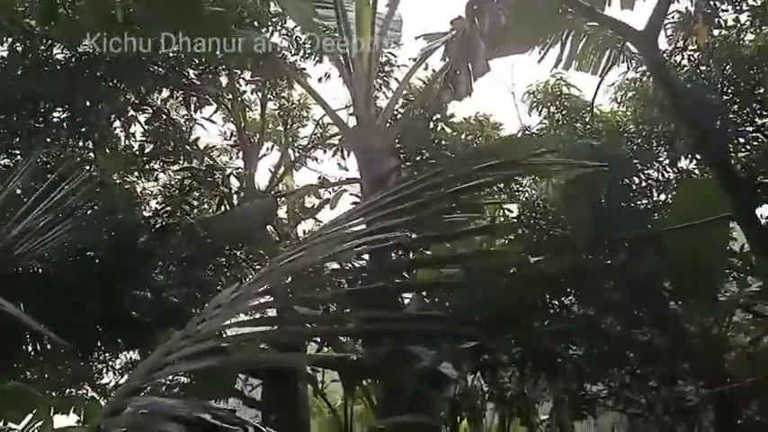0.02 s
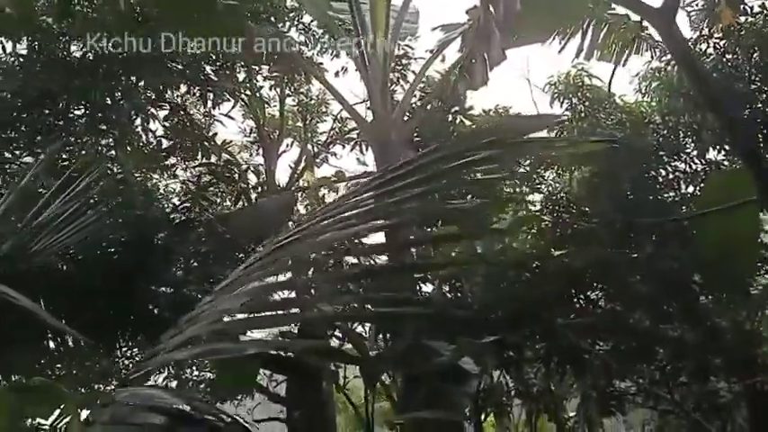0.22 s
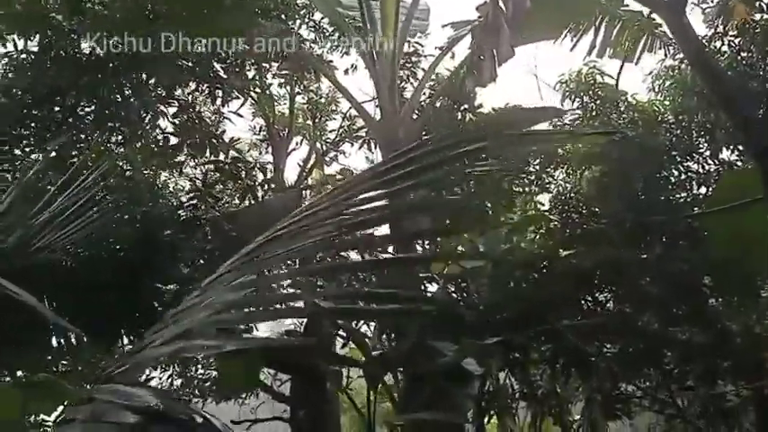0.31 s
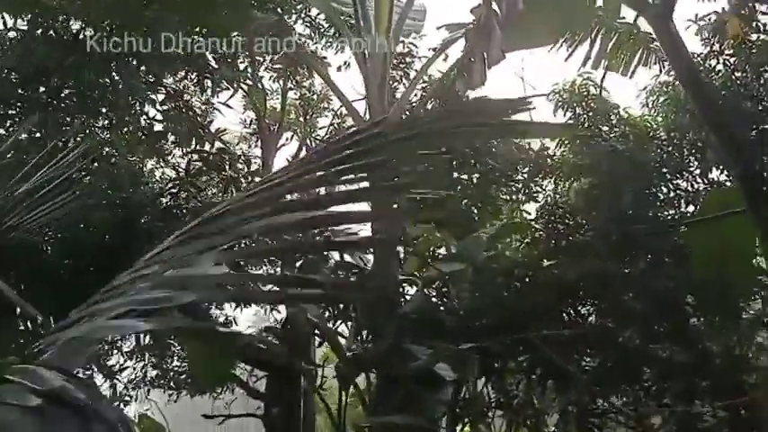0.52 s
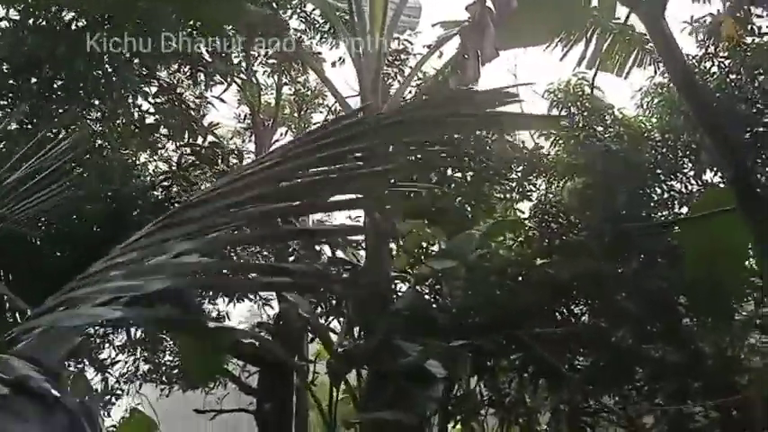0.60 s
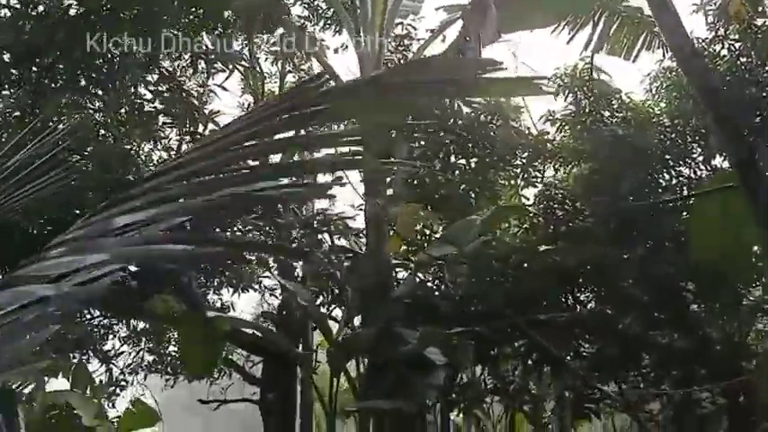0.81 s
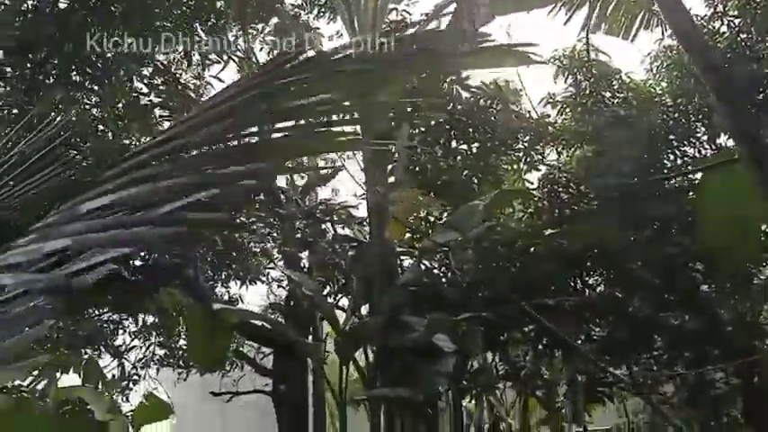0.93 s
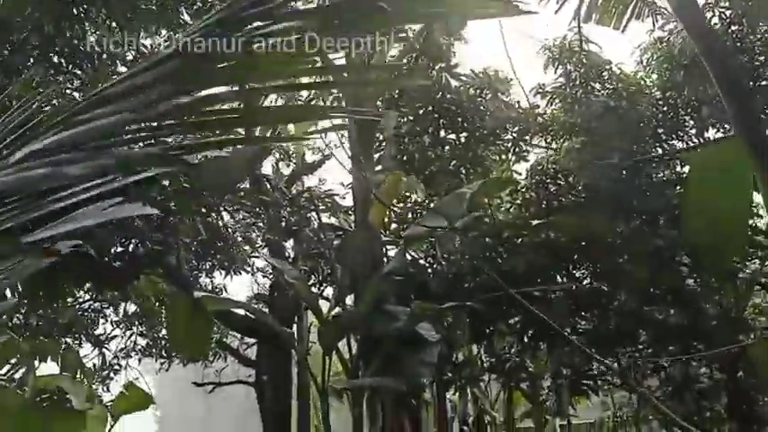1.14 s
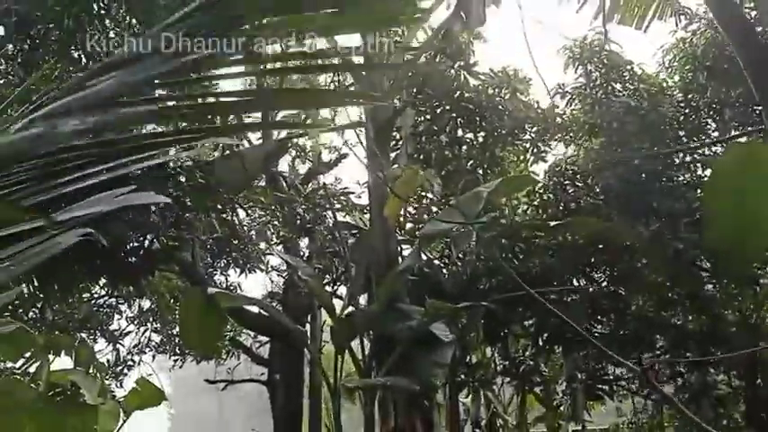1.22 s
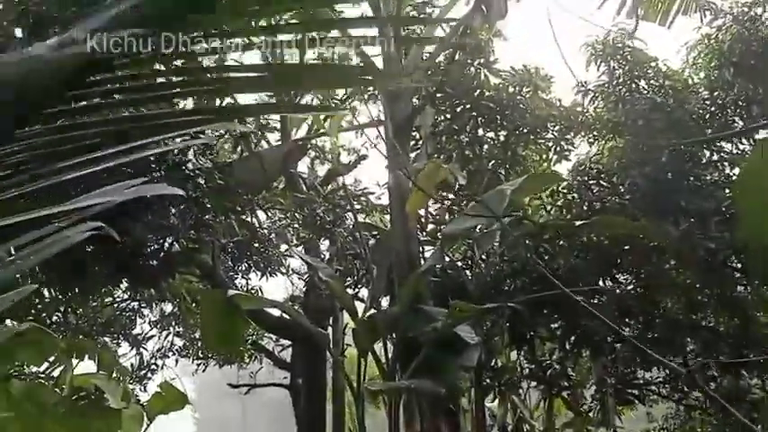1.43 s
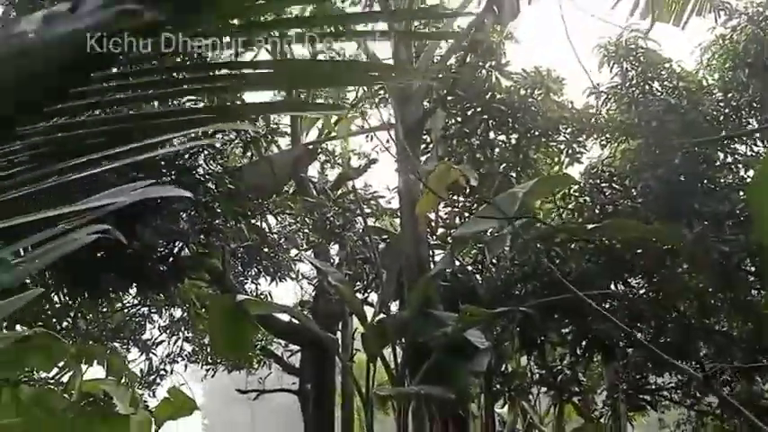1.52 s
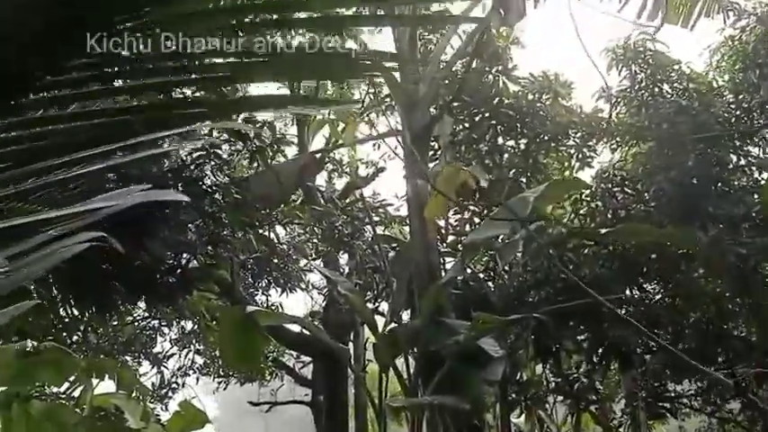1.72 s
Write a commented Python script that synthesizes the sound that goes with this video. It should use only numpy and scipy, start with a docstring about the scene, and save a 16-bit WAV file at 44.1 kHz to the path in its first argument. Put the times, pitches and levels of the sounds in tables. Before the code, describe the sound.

Birds calling in garden trees, one near bird repeating a piercing rising whistle over softer distant chirps

```python
"""Garden trees, under a patchy far chorus and low distant rumble that last throughout (filtered noise).
Softer, more distant notes and dry ticks begin at once: gliding tones with tree echoes, and struck modes.
From 0.2 s a near bird gives a piercing rising whistle every half second: harmonics with wavering tails.
From 0.76 s to 1.4 s one bird calls hoarsely: uneven pulses and breath through a broad throat, with hiss.
"""
import sys
import numpy as np
from scipy import signal
from scipy.io import wavfile

SR = 44100
rng = np.random.default_rng(int(sys.argv[2]) if len(sys.argv) > 2 else 0)


def store_pcm(level_fs):
    """Save levels as 16-bit WAV."""
    pcm = np.round(np.clip(level_fs, -1, 1) * 32767).astype(np.int16)
    wavfile.write(sys.argv[1], SR, np.atleast_2d(pcm).T)


def boost(x):
    """Linear amplitude factor 10**(x/20) for a level x in decibels (scalar or array-like)."""
    u = np.asarray(x, float) / 20
    return 10 ** u


N = 79380
T = np.arange(N) / SR
SIDES = np.array([[.5], [-.5]])  # times a left-minus-right difference: the share of each side


def rms_one(x):
    """Scales a signal to rms 1."""
    return x / np.sqrt(np.mean(x ** 2) + 1e-20)


def at_hz(points, hz):
    """Reads a curve at a frequency, straight between its points on a log frequency axis."""
    points_hz, values = np.transpose(points)
    return np.interp(np.log(hz), np.log(points_hz), values)


def cut(x, hz, kind, order):
    """Butterworth filter that passes the low or the high side of hz."""
    return signal.sosfilt(signal.butter(order, hz, kind, fs=SR, output="sos"), x)


def drift(rate_hz, count):
    """Slow random wander of rms 1, one row each: noise through two equal low-pass poles at rate_hz."""
    step = 20  # samples between drawn values
    pole = np.exp(-2 * np.pi * rate_hz * step / SR)
    noise = rng.standard_normal((count, N // step + 1002))
    slow = signal.lfilter([1], [1, -2 * pole, pole * pole], noise)[:, 1000:]
    return np.array([np.interp(np.arange(N) / step, np.arange(len(v)), rms_one(v)) for v in slow])


def scattered(phase, share, lead):
    """A sine of rms 1; the power share that came through leaves wavers in its own way on each side."""
    flutter_hz = 49.4
    leaves = drift(flutter_hz, count=4)
    phase = phase + lead * SIDES
    in_step = np.sqrt(2 - 2 * share) + np.sqrt(share) * leaves[:2]
    quarter_turn = np.sqrt(share) * leaves[2:]
    return in_step * np.sin(phase) + quarter_turn * np.cos(phase)


def coloured(sources, spectrum, patchy_db):
    """Third-octave bands taken in turn from two (mid, side) pairs, each flickering in level; rms 1."""
    # how alike left and right are: f/Hz, likeness (1 = the same)
    likeness = [(60, 0.96), (125, 0.89), (250, .55), (500, 0.63), (1000, 0.033), (15000, 0.022)]
    edges = 25 * 2 ** (np.arange(29) / 3)
    flicker = drift(8, count=28)
    out = 0
    for k, (low, high) in enumerate(zip(edges, edges[1:])):
        mid, side = cut(sources[k % 2], [low, high], "band", order=2)
        hz = np.sqrt(low * high)
        alike = at_hz(likeness, hz)
        stereo = np.sqrt(1 + alike) * mid + np.sqrt(1 - alike) * side * 2 * SIDES
        out = out + boost(at_hz(spectrum, hz) + patchy_db * flicker[k]) * stereo
    return rms_one(out)


def near_bird():
    """The bird nearest the microphone: four harmonics on one pitch that slides up and holds."""
    # one table a call, tail included:
    # t/s, level/dB, fundamental re level/dB, left minus right of the octave/dB
    calls = [
        [(0.212, -57.5, 15.5, -6), (0.254, -32.5, -4.5, -8.5), (0.274, -39, 3.5, 0), (0.292, -34.5, -10.5, -27),
         (0.314, -45, 9, -1), (0.334, -39, -16, 5), (0.346, -47, 0.5, 4), (0.368, -50.5, 2.5, -27.5),
         (0.398, -53.5, -9, -18), (0.458, -61, -1.5, -2), (0.52, -75, -1, -14)],
        [(0.732, -70.5, 21, -11), (0.74, -49, 8.5, 2), (0.768, -38.5, -11, -15), (0.79, -46, 3, -1),
         (0.814, -36.5, 4.5, -1), (0.858, -43, -4.5, -6.5), (0.876, -52, 4, -5), (0.91, -55, 6.5, -21),
         (0.94, -59.5, 1, -14), (0.962, -60, 9, -6), (0.976, -65, 10, -22), (1.016, -68, 1, -24),
         (1.04, -69, -6, -16)],
        [(1.252, -71, 10, -11), (1.262, -50.5, 5, 14), (1.272, -42, 6.5, -16.5), (1.306, -38.5, 4, 2),
         (1.324, -39.5, -1.5, -5), (1.344, -40.5, -4.5, -9.5), (1.36, -45, 5, -4), (1.376, -46, -8, -16),
         (1.424, -59.5, 4, -1), (1.44, -54, -3, -13.5)],
        [(1.78, -52, 1, -11), (1.8, -47.5, 6, 6)],
    ]
    start_hz, held_hz, glide_s = 3200, 3334, 0.01166
    wobble = 0.00256  # share of the pitch
    attack_s, release_s = 0.0031, 0.09
    leafy = 0.25  # power share through leaves, fundamental and octave
    out = 0
    for call in calls:
        s, db, low_db, pan_db = np.transpose(call)
        hz = held_hz + (start_hz - held_hz) * np.exp(-np.maximum(T - s[0], 0) / glide_s)
        hz = hz * (1 + wobble * drift(32, count=1)[0])
        phase = 2 * np.pi * np.cumsum(hz) / SR
        gate = np.interp(T, [s[0] - attack_s, s[0], s[-1], s[-1] + release_s], [0, 1, 1, 0])
        level = gate * boost(np.interp(T, s, db))
        # lead: radians by which the left side is ahead
        low_gain = boost(np.interp(T, s, low_db) + 4 * SIDES)
        out = out + level * low_gain * scattered(phase, leafy, lead=1.64)
        octave_gain = boost(np.interp(T, s, pan_db) * SIDES + 2.0)
        out = out + level * octave_gain * scattered(2 * phase, leafy, lead=1)
        for harmonic, upper_db in ((3, -20.5), (4, -31)):  # dB re level
            upper_gain = boost(upper_db + 6.5 * SIDES)
            out = out + level * upper_gain * scattered(harmonic * phase, 0.69, lead=1.6)
    return out


def notes(rows, octave_db, third_db, pan_db, octave_pan_db):
    """Each note glides towards its end pitch, rough in pitch and broken in level, and stops."""
    glide_share = 0.35  # glide time constant, share of the note length
    attack_s, release_s = 0.0031, 0.0071
    rough_hz, broken_db = 28, 3  # rms of the wander
    out = 0
    for s, length, hz0, hz1, db in rows:
        hz = hz1 + (hz0 - hz1) * np.exp(-np.maximum(T - s, 0) / (glide_share * length))
        hz = hz + rough_hz * drift(67.5, count=1)[0]
        phase = 2 * np.pi * np.cumsum(hz) / SR
        gate = np.interp(T, [s, s + attack_s, s + length, s + length + release_s], [0, 1, 1, 0])
        level = gate * boost(db + broken_db * drift(36, count=1)[0])
        fundamental = boost(pan_db * SIDES) * np.sin(phase)
        octave = boost(octave_db + octave_pan_db * SIDES) * np.sin(2 * phase)
        out = out + level * (fundamental + octave + boost(third_db) * np.sin(3 * phase))
    return out


def trees(x):
    """A weaker direct path and dense dying echoes off leaves and trunks, other ones on each side."""
    t60_s, onset_s, direct_db = 0.43, 0.0043, -5  # direct path against the echoes
    t = T[:SR // 2]
    echoes = rng.standard_normal((2, len(t))) * boost(-60 * t / t60_s) * (1 - np.exp(-t / onset_s))
    echoes = echoes / np.sqrt(np.sum(echoes ** 2, axis=1, keepdims=True))
    return boost(direct_db) * x + signal.fftconvolve(x, echoes, axes=1)[:, :N]


def far_birds():
    """Birds farther off among the trees: pipers have a strong octave, whistlers nearly one tone."""
    # both tables, levels ahead of the trees: t/s, length/s, start f/Hz, end f/Hz, level/dB
    whistles = [(0.001, 0.045, 6951, 6970, -64.5), (.196, 0.07, 4640, 4925, -58),
                (.495, 0.058, 4901, 5090, -52.5), (.531, 0.048, 6881, 6920, -48.5),
                (.546, 0.04, 3056, 2987, -56.5), (.894, 0.072, 3714, 3904, -44),
                (.901, 0.054, 3081, 3120, -59), (.956, 0.037, 4651, 4721, -55),
                (.991, 0.022, 3151, 3010, -46), (1.031, 0.126, 2940, 2555, -49.5),
                (1.046, .11, 1124, 1074, -64), (1.216, 0.041, 2678, 2650, -42),
                (1.301, 0.095, 5501, 5680, -57.5), (1.431, 0.065, 4360, 4485, -56.5),
                (1.441, 0.044, 4440, 4255, -53.5), (1.442, .035, 2890, 2373, -58),
                (1.511, 0.057, 2937, 2760, -55.5), (1.556, 0.089, 2695, 2600, -51),
                (1.631, 0.028, 4360, 4400, -62), (1.656, 0.0434, 4440, 3750, -53),
                (1.761, 0.052, 4101, 3570, -53), (.21, 0.029, 7000, 7250, -66),
                (.875, 0.042, 6200, 6200, -48), (1.605, 0.058, 1974, 1950, -66),
                (.375, 0.034, 2880, 2850, -62), (.56, .04, 4720, 4700, -62), (1.47, 0.035, 2700, 2600, -57)]
    pipers = [(0, 0.014, 3280, 3460, -64.5), (.15, 0.072, 3130, 3200, -52.5),
              (.205, 0.029, 2600, 2696, -54), (.33, 0.025, 2560, 2433, -55),
              (.675, 0.084, 2968, 2955, -51.5), (.722, 0.022, 2457, 2820, -45.5),
              (.775, 0.084, 2834, 2857, -47), (1.2, 0.13, 3168, 3236, -51.5),
              (1.24, 0.045, 2687, 2750, -48.5), (1.275, 0.098, 2826, 2973, -49),
              (1.435, 0.11, 3138, 3173, -50), (1.71, 0.042, 3360, 3168, -46.5),
              (1.745, 0.076, 2575, 2817, -46.5)]
    whistling = notes(whistles, octave_db=-27, third_db=-18, pan_db=-0.5, octave_pan_db=0)
    piping = notes(pipers, octave_db=-6, third_db=-20, pan_db=3.5, octave_pan_db=-3)
    return trees(whistling + piping)


def hoarse_bird():
    """Uneven pulses with much breath, through a broad throat; a hiss of the same source joins in."""
    # course of the call: t/s, level/dB, hiss re level/dB, ahead of the gains below
    course = [(0.76, -70, -6), (0.766, -80, -8), (0.786, -55.5, -27), (0.854, -57.5, -14),
              (0.954, -53.5, -1.5), (0.988, -59.5, 4), (0.99, -55.5, -3), (1.17, -58.5, -2.5),
              (1.224, -65, -12), (1.26, -66.5, -4)]
    # throat and hiss filters: f/Hz, level/dB (relative, per Hz)
    throat_colour = [(290, -57), (500, -29.5), (926, -16), (1090, -19), (1220, -17.5), (1870, -8.5),
                     (2430, -2), (2750, -5), (5000, -39), (6500, -34), (11000, -120)]
    hiss_colour = [(2060, -25), (3500, 4.5), (3930, -4), (5230, -7), (9100, -6), (11800, -21), (12400, -50),
                   (13000, -17), (15000, -23)]
    pulse_hz, jitter = 544.3, 0.04  # jitter: share of the pulse rate
    breath = 0.55  # power share
    throat_db, hiss_gain_db, pan_db = 7.5, 6.5, -5.4
    cycles = np.cumsum(pulse_hz * (1 + jitter * drift(60, count=1)[0])) / SR
    pulses = rms_one(np.diff(np.floor(cycles), prepend=0))
    source = np.sqrt(1 - breath) * pulses + np.sqrt(breath) * rng.standard_normal((2, 2, N))
    s, db, hiss_db = np.transpose(course)
    hiss = boost(np.interp(T, s, hiss_db) + hiss_gain_db) * coloured(source, hiss_colour, patchy_db=1.0)
    voice = boost(throat_db + pan_db * SIDES) * coloured(source, throat_colour, patchy_db=2.0)
    gate = np.interp(T, [s[0] - .01, s[0], s[-1], s[-1] + 0.15], [0, 1, 1, 0])
    return gate * boost(np.interp(T, s, db)) * (voice + hiss)


def ticks():
    """Short dry ticks among the leaves, to the right: each click rings three quickly dying modes."""
    # t/s, level/dB ahead of the mode levels
    strikes = [(0.0543, -56.5), (0.1396, -58), (0.2374, -50.5), (0.4454, -51.5), (0.6744, -53),
               (1.2705, -49), (1.4331, -50.5), (1.502, -47.5), (1.6132, -56)]
    # f/Hz, level/dB, t60/s
    modes = [(2050, 7.5, 0.0077), (1610, -14, 0.009), (1020, -29, 0.0089)]
    pan_db, bass_cut_hz = -14, 800
    s, db = np.transpose(strikes)
    spread_db = rng.normal(0, 1.0, (len(s), 3))
    out = 0
    for k, (hz, level_db, t60) in enumerate(modes):
        clicks = np.full(N, 1e-18)
        clicks[(s * SR).astype(int)] = boost(db + level_db + spread_db[:, k])
        r, w = boost(-60 / (t60 * SR)), 2 * np.pi * hz / SR
        out = out + signal.lfilter([0, np.sin(w)], [1, -2 * r * np.cos(w), r * r], clicks)
    return cut(out * boost(pan_db * SIDES), bass_cut_hz, "high", order=2)


def chorus_and_rumble():
    """The distance: one bed of coloured noise, steady rumble below and a swelling far chorus above."""
    # colour of the bed: f/Hz, level/dB (relative, per Hz)
    bed_colour = [(35, -32), (60, 3), (123, -0.5), (497, -10.5), (613, -7.5), (791, -16.5), (2250, -10.5),
                  (2590, 0.5), (2980, -7.5), (4420, -30), (4960, 6), (5440, -19.5), (6870, -15),
                  (7360, -16), (15500, -31.5)]
    # swell of the chorus: t/s, level/dB
    chorus_swell = [(0, 5), (.1, -2.5), (.3, -1.5), (.5, -4.5), (.7, 1.7), (1.2, 3.2), (1.4, 9.5),
                    (1.55, 3.3), (1.7, -8), (1.8, 3)]
    bed_db, chorus_from_hz = -59.5, 1690  # level ahead of the swell
    bed = boost(bed_db) * coloured(rng.standard_normal((2, 2, N)), bed_colour, patchy_db=1.0)
    swell = boost(np.interp(T, *np.transpose(chorus_swell)))
    rumble = cut(bed, chorus_from_hz, "low", order=2)
    chorus = cut(bed, chorus_from_hz, "high", order=2)
    return rumble - swell * chorus  # minus: the two filters are in opposite phase where they meet


def scene():
    """All birds and ticks over the distant bed."""
    return near_bird() + far_birds() + hoarse_bird() + ticks() + chorus_and_rumble()


def roll_off(x):
    """The treble ends steeply here."""
    return signal.sosfilt(signal.butter(12, 15640, fs=SR, output="sos"), x)


def record(dry):
    """The microphone cuts the deepest bass, below 59 Hz."""
    mix = cut(dry, 59, "high", order=3)
    return roll_off(mix)


dry = scene()
out = record(dry)
store_pcm(out)
```